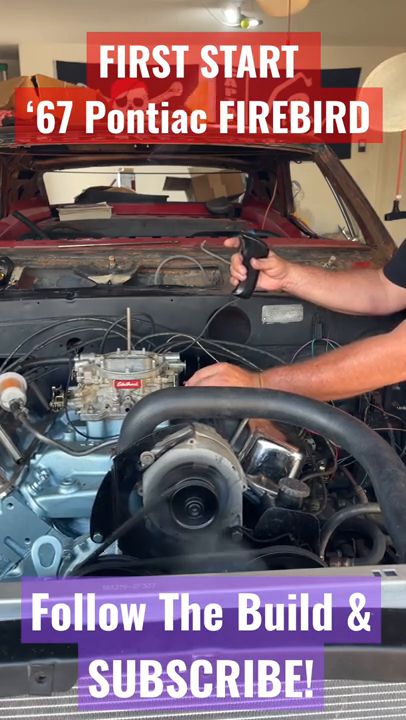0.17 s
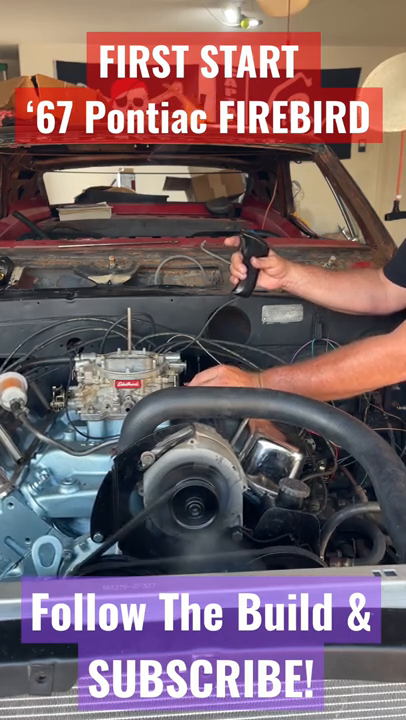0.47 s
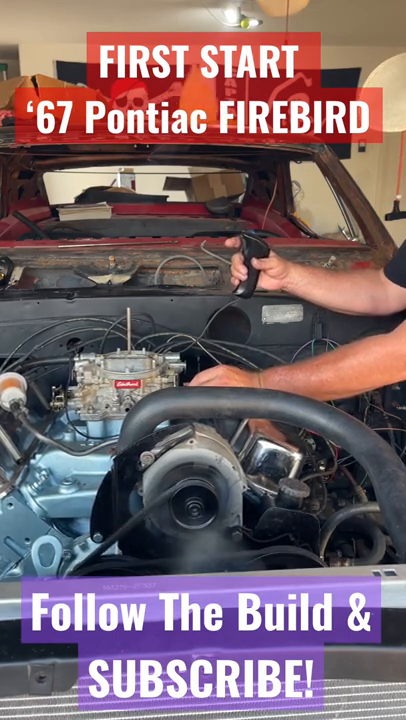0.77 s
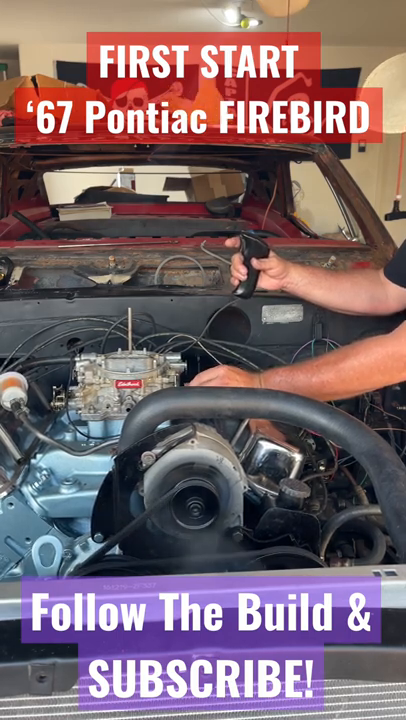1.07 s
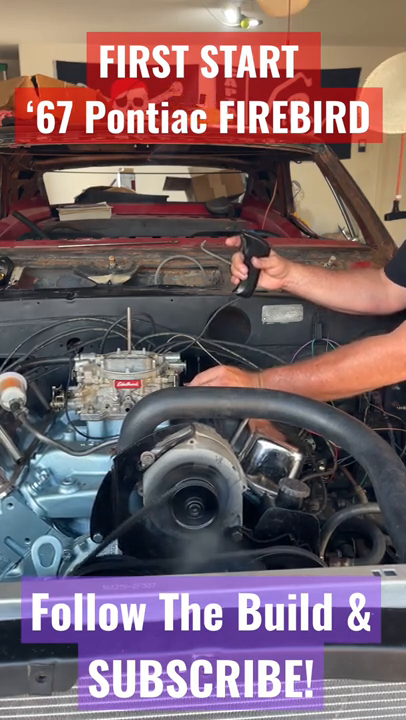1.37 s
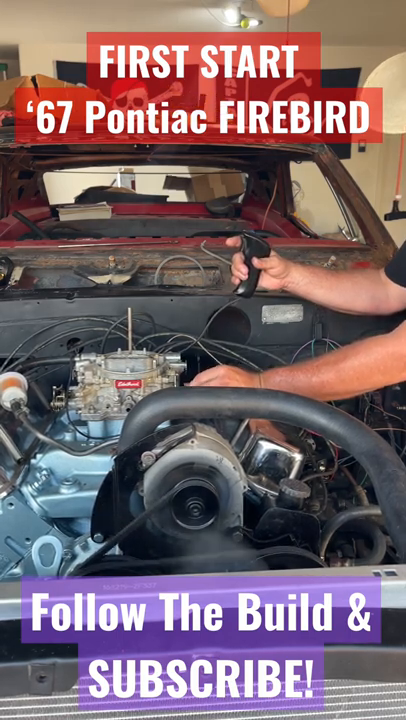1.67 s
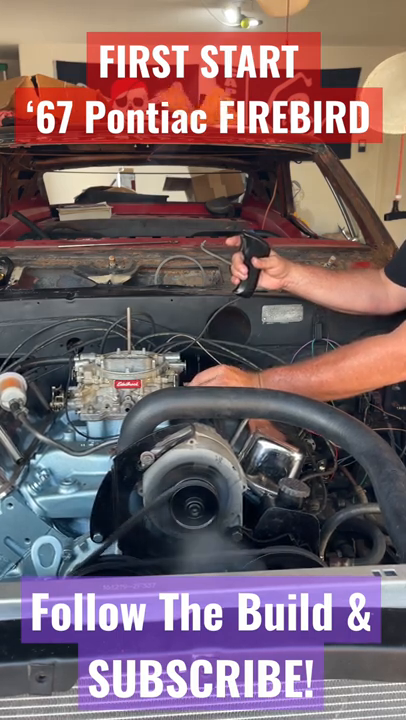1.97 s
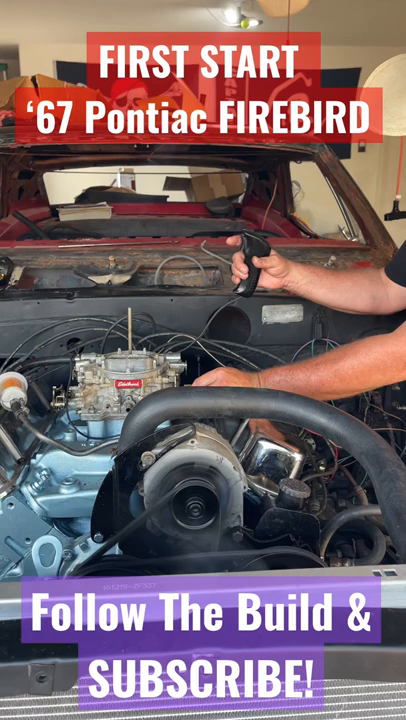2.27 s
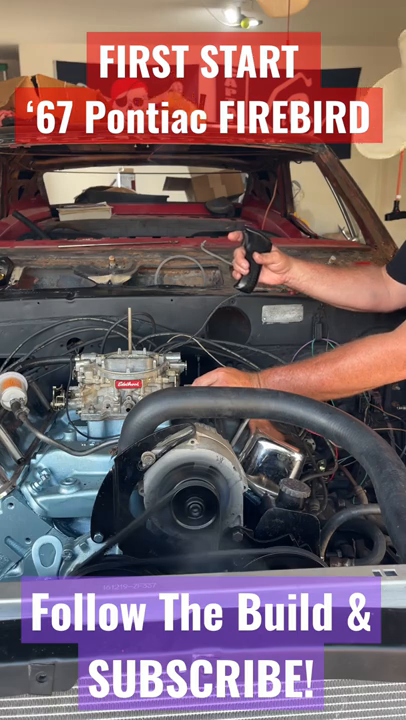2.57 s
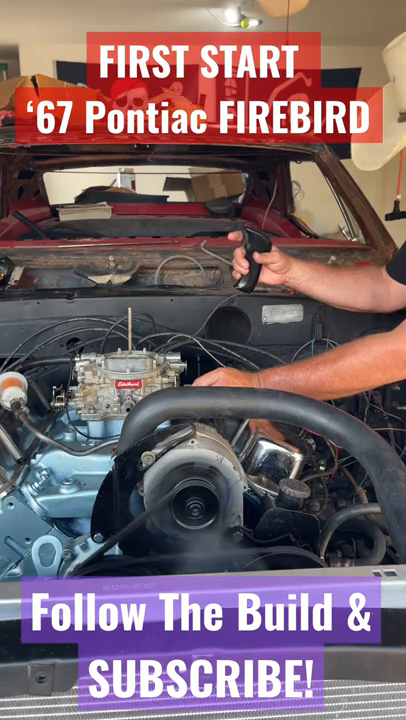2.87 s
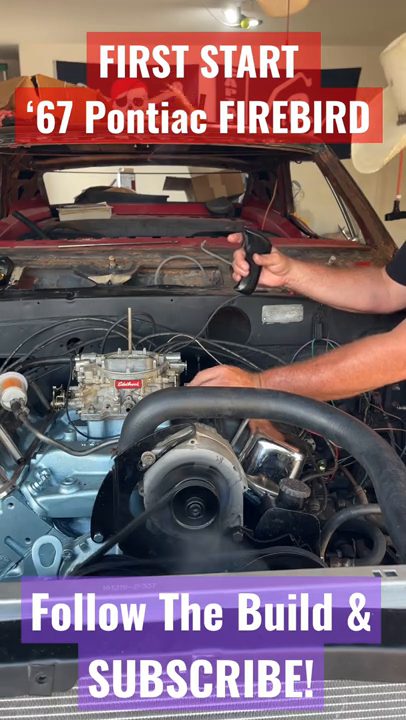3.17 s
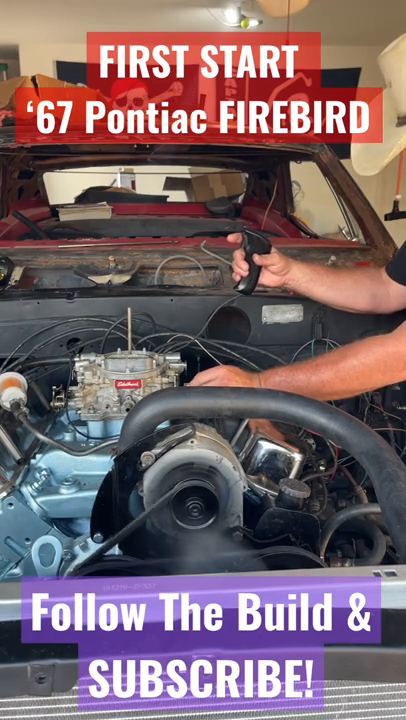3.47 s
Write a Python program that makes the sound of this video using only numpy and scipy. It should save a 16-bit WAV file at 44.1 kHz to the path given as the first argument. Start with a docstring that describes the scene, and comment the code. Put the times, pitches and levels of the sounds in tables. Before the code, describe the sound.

A loud V8 car engine, heard close in stereo from in front of the bay in a garage, is already revving and rises to a raspy roar by about 0.8 s. It dips, surges again near 1.4 and 2.0 s, then winds down from 2.3 s to a quieter, thudding near-idle at 3.6 s. Pops and brief metal rattles come now and then; carburettor hiss and whirr emerge late.

```python
"""A loud V8 engine is revved by hand in a garage, heard from just in front of the engine bay.
Steady tones make its boom at the firing rate and a lope at half that rate, when every other cylinder
falls weak. Filtered noise bursts, one for each firing, make the thuds, roar and rasp.
Pops and short metal rattles come now and then. The engine sinks towards idle over filtered noise:
the open carburettor's hiss with a mechanical whirr. The garage adds its echoes."""
import sys
import numpy as np
from scipy import signal
from scipy.fft import rfft, irfft
from scipy.io import wavfile

SR = 44100
rng = np.random.default_rng(int(sys.argv[2]) if len(sys.argv) > 2 else 0)


def store_wav(level_fs):
    """Save 16-bit WAV to argv[1]."""
    pcm = np.round(np.clip(np.atleast_2d(level_fs), -1, 1) * 32767)
    wavfile.write(sys.argv[1], SR, pcm.T.astype(np.int16))


N = 159642  # length in samples

CYLINDERS = 8  # so one full engine cycle has 8 firings
WAVER_HZ = 11  # how quickly speed and tone levels wander

# How fast the engine fires: columns t/s, firing rate f/Hz
SPEED = [(0, 128.7), (.1, 139.3), (.2, 146.5), (.3, 167.2), (.4, 179.4), (.48, 181.3), (.58, 180),
         (.67, 175.2), (.78, 191.8), (.9, 189.3), (1.05, 174.8), (1.24, 156.5), (1.4, 172.3), (1.55, 165.6),
         (1.78, 147.7), (1.9, 156.8), (2, 175.2), (2.1, 172.7), (2.3, 157.5), (2.55, 131.8), (2.8, 110.9),
         (3.2, 81.43), (3.42, 70.23), (3.62, 62.1)]


def crankshaft():
    """Counts the firings so far by adding up the engine speed, which jitters by about half a percent."""
    jitter = 1 + .005 * wander(WAVER_HZ)
    return np.cumsum(curve(SPEED) * jitter) / SR


# The boom at the firing rate: columns t/s, level/dB
BOOM = [(0, -11.5), (.22, -7.5), (.32, -17), (.38, -13), (.48, -10.5), (.65, -19), (.75, -16), (.87, -25),
        (.98, -21), (1.14, -30), (1.3, -18), (1.52, -29), (1.74, -15), (1.89, -10.5), (1.96, -19),
        (2.07, -18), (2.19, -27), (2.32, -18), (2.48, -15), (2.65, -17), (3, -19), (3.12, -15.5),
        (3.36, -24), (3.62, -35)]
# The tone an octave above the boom: columns t/s, level/dB
OCTAVE = [(0, -19), (.45, -21.5), (1, -44), (1.35, -27), (1.7, -42), (1.93, -19), (2.1, -41), (2.9, -37.5),
          (3.3, -26), (3.62, -28.5)]
# The lope at half the firing rate: columns t/s, level/dB
LOPE = [(0, -50), (.48, -42), (.54, -14.5), (.63, -15), (.72, -22), (.85, -24), (.95, -15.5), (1.1, -20.5),
        (1.26, -19), (1.35, -36), (1.47, -17.5), (1.8, -23), (1.93, -36), (2.13, -19), (2.46, -23.5),
        (2.6, -36), (3.62, -57)]
# Tones that rise and fall with the lope: columns f/(engine cycle rate), level/dB added to the lope
LOPE_ORDERS = [(3, -10), (4, 0), (12, -4)]
# Tones of the uneven cylinder banks: columns f/(engine cycle rate), level/dB added to the pull
BANK_ORDERS = [(5, 1), (6, 3), (7, 1.5), (9, -1), (10, -2.5), (13, 1.5), (18, -3), (19, -6)]
# How hard the engine works under the throttle: columns t/s, roar level/dB, rasp level/dB
EFFORT = [(0, -17, -25.5), (.08, -22.5, -30.5), (.18, -20.5, -29.5), (.28, -17, -22.5), (.37, -17.5, -25),
          (.46, -17.5, -28), (.54, -23, -32), (.63, -22, -28.5), (.7, -18, -25), (.85, -21.5, -31),
          (1.06, -26, -33), (1.24, -24.5, -33.5), (1.35, -19, -29), (1.52, -25.5, -35.5),
          (1.74, -26, -35.5), (1.91, -18.5, -26), (2.14, -24.5, -34.5), (2.4, -26, -37), (2.65, -29, -42),
          (3, -32.5, -60), (3.4, -37, -52), (3.62, -28, -51)]
BANK_FOLLOW = 1.6  # dB of bank tone for each dB of roar effort
TONE_WAVER, BANK_WAVER = .091, .45  # rms wander, as a share of each tone's size


def exhaust_notes(firings):
    """Regular firing makes pure tones at multiples of the cycle rate; bank tones grow steeply with effort."""
    def note(order, level_db, waver=TONE_WAVER):
        turns = order * firings / CYLINDERS + rng.random()
        size = amp(level_db) * (1 + waver * wander(WAVER_HZ))
        return size * np.sin(2 * np.pi * turns)

    boom = note(CYLINDERS, curve(BOOM)) + note(2 * CYLINDERS, curve(OCTAVE))
    lope = sum(note(round(order), curve(LOPE) + db) for order, db in LOPE_ORDERS)

    cycle_hz = curve(SPEED) / CYLINDERS
    pull_db = BANK_FOLLOW * curve(EFFORT)
    banks = 0
    for order, db in BANK_ORDERS:
        level_db = pull_db + db + ring_db(order * cycle_hz)
        banks = banks + note(round(order), level_db, BANK_WAVER)
    return boom + lope + banks


# Tone colour of the thuds: columns f/Hz, level/dB
THUD = [(25, -30), (62, -5), (120, 2.5), (200, -3), (400, -13), (5000, -72)]
THUD_DB = -11.5  # starting level, before effort and lope are added
THUD_FOLLOW, THUD_LOPE = .37, .1  # dB of thud for each dB of roar effort, and of lope


def thuds(firings):
    """Firings of random strength, plus steady noise, rumble between the tones, rising with effort and lope."""
    fired = np.diff(np.floor(firings), prepend=0)
    knocks = unit(fired * rng.standard_normal(N)) + .5 * rng.standard_normal(N)
    level_db = THUD_DB + THUD_FOLLOW * curve(EFFORT) + THUD_LOPE * curve(LOPE)
    return unit(colour(knocks, THUD)) * amp(level_db)


# Tone colour of the low exhaust roar: columns f/Hz, level/dB
ROAR = [(60, -48.5), (150, -4), (260, -3.5), (400, -3.5), (700, -6.5), (1200, -12.5), (2000, -19),
        (5000, -57)]
# Tone colour of the bright rasp: columns f/Hz, level/dB
RASP = [(300, -26.5), (900, -10.5), (1600, 0), (2300, -3), (3200, -6), (6500, -8.5), (9000, -10.5),
        (11000, -4.5), (15000, -37)]
ROAR_DB, RASP_DB = -.8, 3  # dB added to the two effort columns
ROAR_BEAT, RASP_BEAT = .65, .25  # share of the noise power that comes in separate bursts
PUFF_SPREAD_DB = 2  # how much the firings differ in strength
BURST_S = .004  # time for a burst to fade to about a third, in s


def puffs(firings, size=1024):
    """Each cylinder repeats its own noise burst every cycle, in turbulent gas that roars and rasps."""
    number = firings.astype(int)
    # One random strength for each firing
    spread_db = PUFF_SPREAD_DB * np.clip(rng.standard_normal(N), -2, 2)
    strength = amp(spread_db)[number]
    fired = np.diff(number, prepend=0) * strength

    fade = np.exp(-np.arange(size) / SR / BURST_S)
    beat = np.zeros(N)
    for cylinder in range(CYLINDERS):
        burst = rng.standard_normal(size) * fade
        own_firings = fired * (number % CYLINDERS == cylinder)
        beat += signal.oaconvolve(own_firings, burst)[:N]
    beat = unit(beat)

    def flow(share):
        turbulence = unit(strength * rng.standard_normal(N))
        return np.sqrt(share) * beat + np.sqrt(1 - share) * turbulence

    roar = colour(flow(ROAR_BEAT) * amp(ROAR_DB + curve(EFFORT)), ROAR)
    rasp = colour(flow(RASP_BEAT) * amp(RASP_DB + curve(EFFORT, order=2)), RASP)
    return roar + rasp


# Exhaust pops and carburettor spits: columns t/s, thump level/dB, spit level/dB, decay/s
POPS = [(.685, -17.5, -24.5, 0.057), (1.157, -19, -25, 0.006), (3.453, -26, -27.5, 0.023),
        (3.546, -34, -27, 0.056), (3.602, -28, -26, 0.021)]
POP_RISE_S = .004


def pops():
    """Late-burning fuel goes off in short noise bursts: a low thump and a bright spit together."""
    thump, spit = np.zeros((2, N))
    for start, thump_db, spit_db, decay in POPS:
        t = np.maximum(np.arange(N) / SR - start, 0)
        rise = np.minimum(t / POP_RISE_S, 1)
        burst = rise * np.exp(-np.maximum(t - POP_RISE_S, 0) / decay)
        thump += amp(thump_db) * burst
        spit += amp(spit_db) * burst
    low = colour(thump * rng.standard_normal(N), ROAR)
    bright = colour(spit * rng.standard_normal(N), RASP)
    return low + bright


# Brief knocks and metallic rattles in the engine bay: columns t/s, f/Hz, level/dB
RATTLES = [(.561, 1186, -16), (1.156, 650.3, -13), (1.884, 2316, -22), (2.025, 2279, -22.5),
           (3.452, 730, -22), (3.603, 3140, -21)]
RATTLE_S = .014  # whole length of one rattle, in s


def rattles():
    """A loose metal part rings for a moment: a tone of unsteady pitch that swells and fades."""
    out = np.zeros(N)
    for start, hz, db in RATTLES:
        t = np.arange(N) / SR - start
        swell = np.sin(np.pi * np.clip(t / RATTLE_S, 0, 1)) ** 2
        out += amp(db) * swell * np.sin(2 * np.pi * hz * t + wander(hz / 20))
    return out


# Tone colour of the idle noise: air hiss past the throttle plates, with a mechanical whirr
# near 410 Hz: columns f/Hz, level/dB
IDLE_NOISE = [(260, -4), (410, 11), (600, -10), (1500, -2.5), (2900, -8), (4300, -1), (9000, -2),
              (11200, 5.5), (12500, -6), (14500, -24)]
IDLE_NOISE_DB = -28  # level before the fall with speed
IDLE_NOISE_FALL = .045  # dB quieter for each Hz of firing rate


def idle_noise():
    """Filtered noise makes the carburettor's air hiss and a mechanical whirr, louder towards idle."""
    level_db = IDLE_NOISE_DB - IDLE_NOISE_FALL * curve(SPEED)
    return amp(level_db) * colour(rng.standard_normal(N), IDLE_NOISE)


# Resonances of the engine bay and pipes: columns f/Hz, width/Hz, lift level/dB
RINGS = [(139, 45, 2.5), (277, 41, 2.5), (410.4, 17, 5.5), (592.4, 29, 5), (768, 46, 4), (1034, 65, 4.5),
         (1180, 60, 4), (2245, 110, 4)]


def ring_db(hz):
    """The bay and pipes strengthen sound near their own resonances; gives the lift in dB."""
    return sum(db / (1 + (2 * (hz - f) / width) ** 2) for f, width, db in RINGS)


ROOM_T60_S = .39  # time for the echoes to fall by 60 dB
ROOM_DB = -8.5  # echoes compared with the direct sound


def garage(x, size=24000, spacing=20):
    """Walls return sparse echoes that die away; gives the sound with echoes, then the echoes alone."""
    # On average one echo in every 20 samples, with a random sign
    echoes = rng.choice([-1., 1.], size) * (rng.random(size) < 1 / spacing)
    tail = echoes * amp(-60 * np.arange(size) / SR / ROOM_T60_S)
    wet = signal.fftconvolve(x, tail / np.linalg.norm(tail))[:N]
    mixed = (x + amp(ROOM_DB) * wet) / np.sqrt(1 + amp(ROOM_DB) ** 2)
    return mixed, wet


# How far the left microphone leads the right: columns f/Hz, phase/rad
PORT_PHASE = [(0, 0), (2100, 0), (2900, .6), (4200, 1), (4850, 3.14), (5250, 4.8), (6600, 7.2), (9500, 9.8),
              (12200, 12.3), (15000, 12.8)]
# Left compared with right: columns f/Hz, level/dB
BALANCE = [(60, -.2), (600, -1.3), (5000, -.1)]
# Gain of the diffuse echoes that differ between the sides: columns f/Hz, level/dB
DIFFUSE = [(220, -35), (480, -13), (1100, -14), (1700, -14), (3500, -10), (7000, -21)]


def microphones(x, diffuse):
    """Two microphones hear the engine at shifted phases, and the diffuse echoes with opposite signs."""
    hz = np.fft.rfftfreq(N, 1 / SR)
    mid = rfft(x)
    side = rfft(diffuse) * amp(read(DIFFUSE, hz))
    # Half of each difference goes to each side
    turn = np.exp(.5j * read(PORT_PHASE, hz)) * amp(read(BALANCE, hz) / 2)
    left, right = (mid + side) * turn, (mid - side) / turn
    return irfft(np.array([left, right]), N)


def amp(db):
    """Turns decibels into a gain."""
    return 10 ** (np.asarray(db) / 20)


def unit(x):
    """Scales a sound to an rms of 1."""
    return x / np.sqrt(np.mean(x ** 2) + 1e-20)


def curve(table, order=1):
    """Draws straight lines through one column of a time table, giving a value for every sample."""
    rows = np.array(table, float)
    return np.interp(np.arange(N) / SR, rows[:, 0], rows[:, order])


def read(points, hz):
    """Reads a frequency table between its points, on a log-frequency axis."""
    f, value = np.transpose(points)
    return np.interp(np.log(hz + 1), np.log(f + 1), value)


def wander(rate_hz):
    """Slow random drift of rms 1: noise with the parts well above the given rate taken out."""
    hz = np.fft.rfftfreq(N, 1 / SR)
    slow = rfft(rng.standard_normal(N)) * np.exp(-(hz / rate_hz) ** 2)
    return unit(irfft(slow, N))


def colour(x, spectrum, size=8192):
    """Filters a sound to a tone colour plus the bay's resonances, with no sound before its cause."""
    hz = abs(np.fft.fftfreq(size, 1 / SR))
    log_gain = np.log(amp(read(spectrum, hz) + ring_db(hz)))
    # The Hilbert transform finds the phase that puts the filter's energy as early as possible
    response = np.exp(np.conj(signal.hilbert(log_gain)))
    taps = np.fft.ifft(response).real[:size // 2]
    return signal.oaconvolve(x, taps / np.linalg.norm(taps))[:N]


def scene():
    """One crankshaft times the tones, thuds and puffs; the other layers join them in the garage."""
    firings = crankshaft()
    noisy = garage(puffs(firings) + pops() + rattles() + idle_noise())[0]
    engine = noisy + thuds(firings) + exhaust_notes(firings)
    echoes = garage(engine)[1]
    return microphones(engine, echoes)


KNEE, CEILING = .65, .95  # where rounding starts, and the height it approaches (full scale is 1)
EDGE_HZ = 15000  # the treble is cut above this


def record(dry):
    """The recorder rounds off the highest peaks, then cuts the top treble."""
    room = CEILING - KNEE
    over = np.maximum(abs(dry) - KNEE, 0)
    held = dry - np.sign(dry) * (over - room * np.tanh(over / room))
    lowpass = signal.firwin(511, EDGE_HZ, window=("kaiser", 9), fs=SR)
    return signal.oaconvolve(held, lowpass[None], "same")


dry = scene()
out = record(dry)
store_wav(out)
```